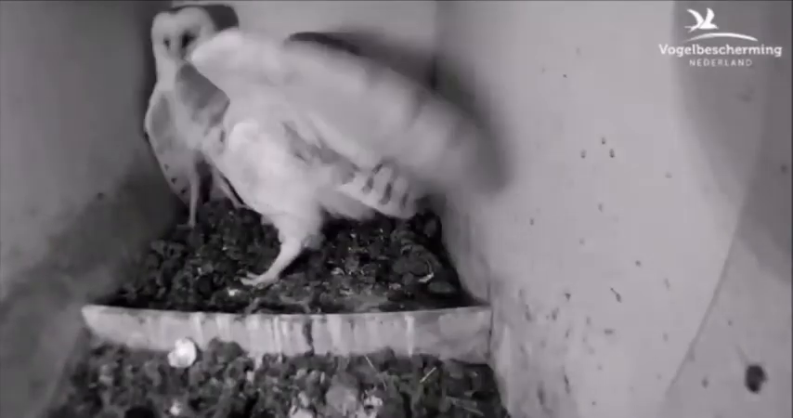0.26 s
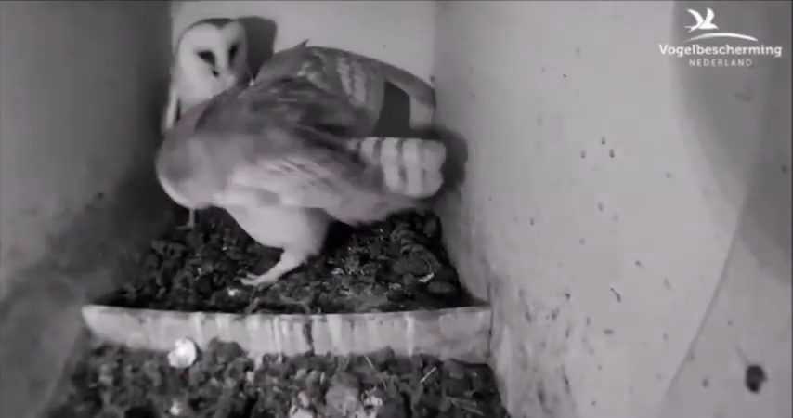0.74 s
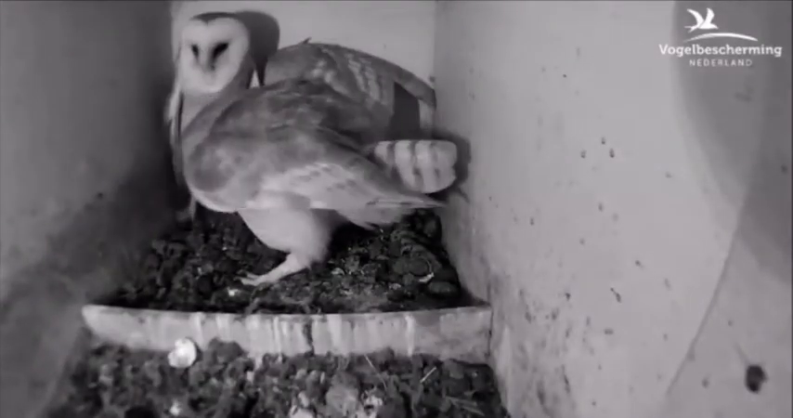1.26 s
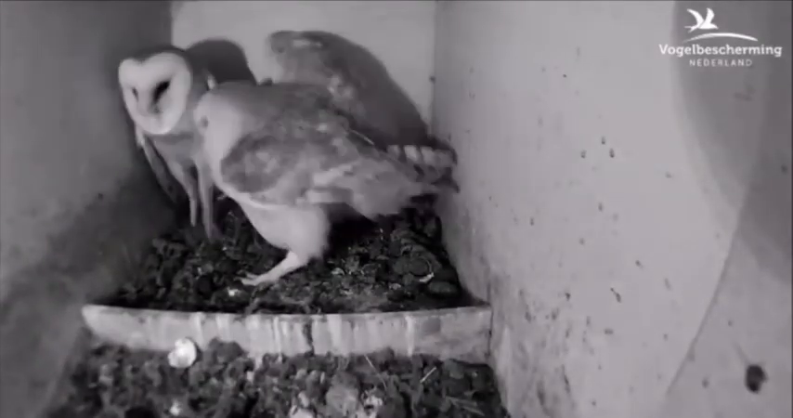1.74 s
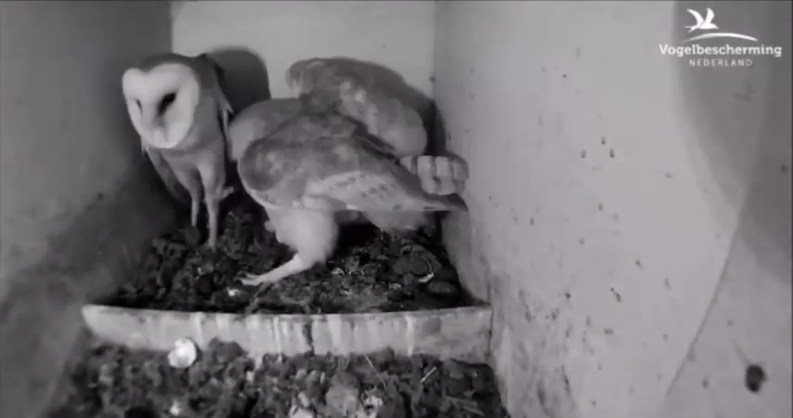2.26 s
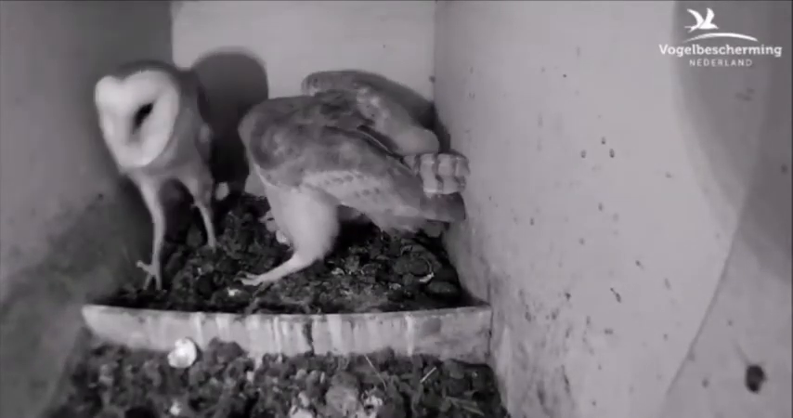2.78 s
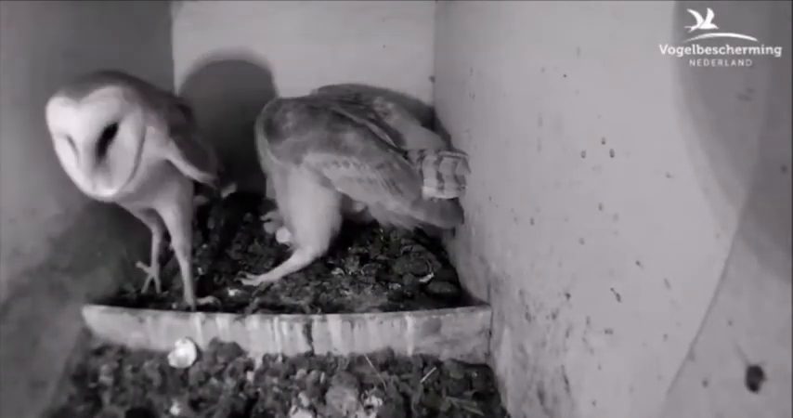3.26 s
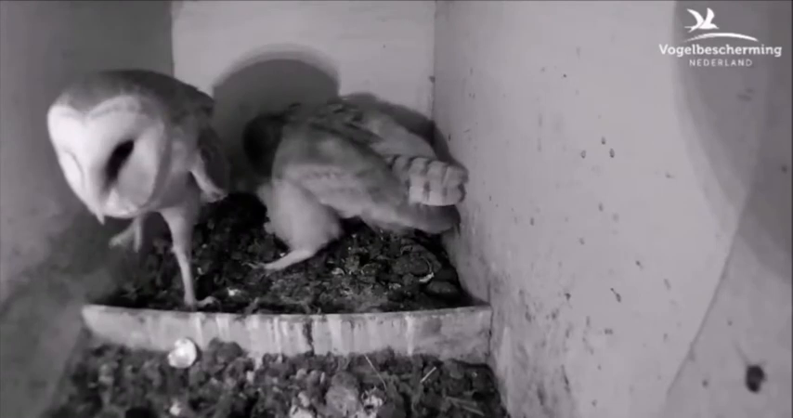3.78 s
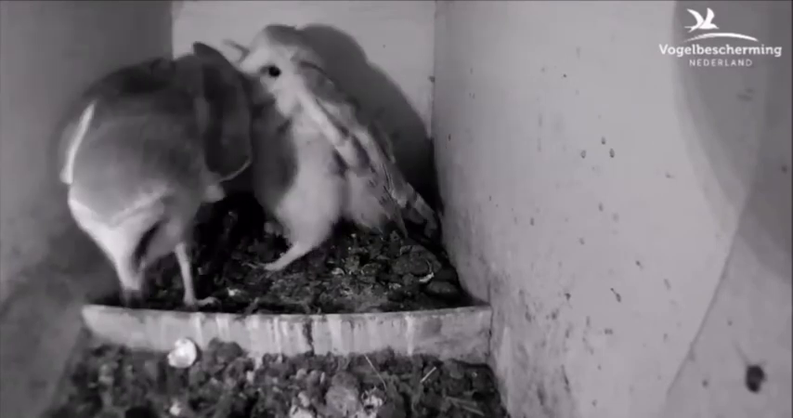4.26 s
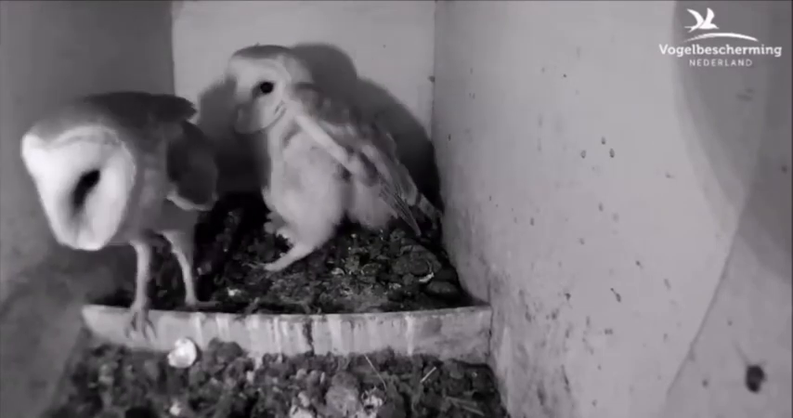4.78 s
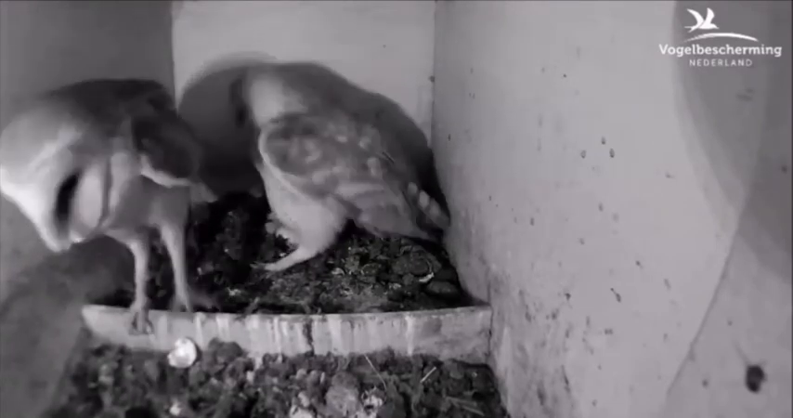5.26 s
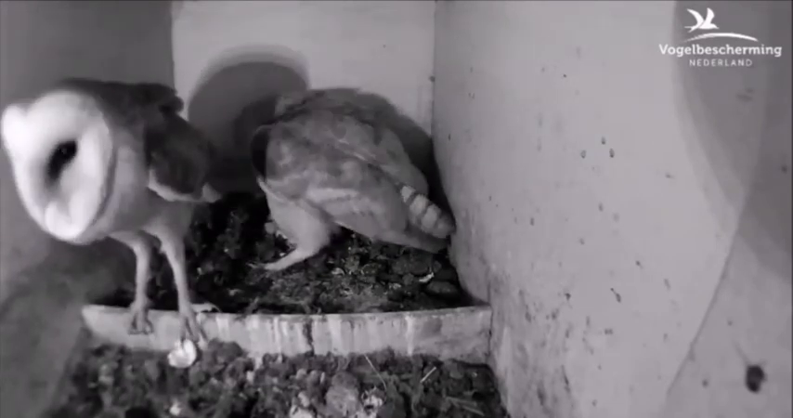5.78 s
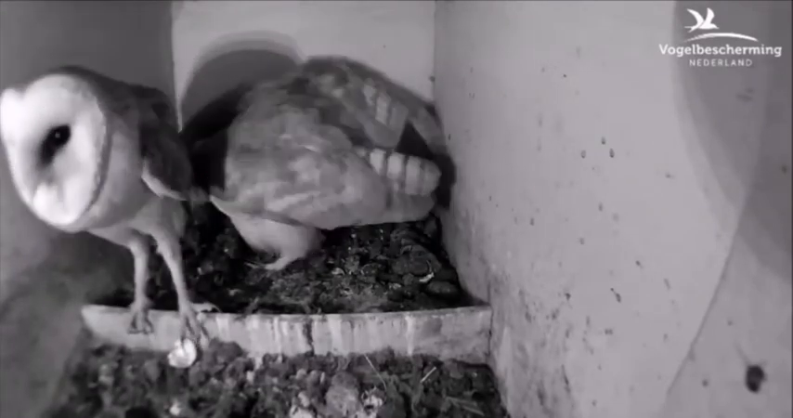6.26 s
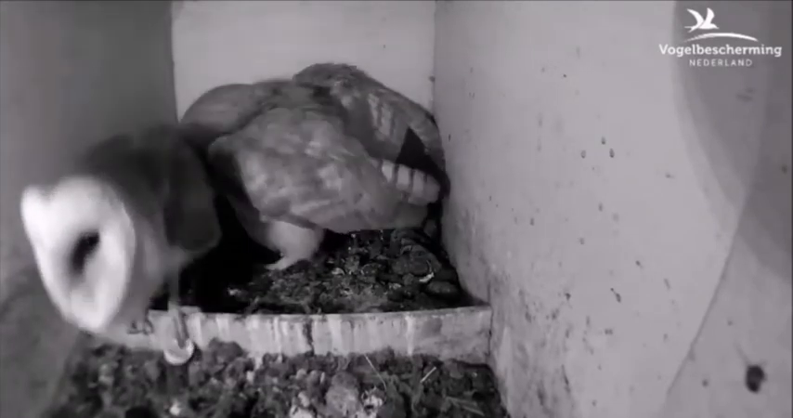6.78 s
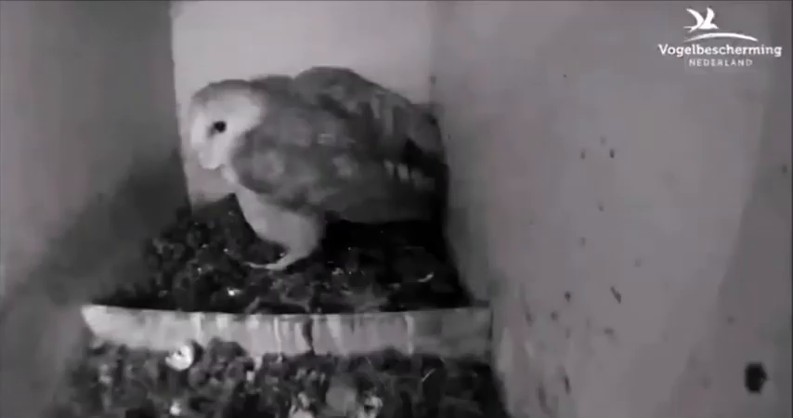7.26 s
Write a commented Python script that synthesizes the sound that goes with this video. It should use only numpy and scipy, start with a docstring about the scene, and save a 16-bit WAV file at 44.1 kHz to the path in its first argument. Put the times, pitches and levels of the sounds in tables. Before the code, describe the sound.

Inside a wooden nest box, a barn owl is already screeching: a long, rasping, fluttering hiss that swells and stops. A thinner, weaker hiss fills the break, then two more long screeches follow, with dull foot thuds on the boards. After the third, claws scratch the litter, two heavy bumps strike the box with a faint feather brush, and a new call just begins. Close, small, narrow-band microphone with little treble.

```python
"""Long rasping hiss-screeches, with thuds among them; the last begins after the bumps.
Two barn owls are in a wooden nest box: one gives three screeches and starts a fourth; a thinner hiss fills
the first break. In each, two shrill voices warble some fifty times a second through moving resonances.
Feet thud on the boards, which ring; one owl bumps the box twice as it leaves, its feathers brushing the wall.
Short gritty noise bursts are claws in the litter, a surge in the hiss and a last puff of the call.
A small, narrow-band microphone sits inside."""
import sys
import numpy as np
from scipy import signal
from scipy.fft import rfft, irfft, next_fast_len
from scipy.io import wavfile
from scipy.ndimage import uniform_filter1d

SR = 44100
rng = np.random.default_rng(int(sys.argv[2]) if len(sys.argv) > 2 else 0)


def file_out(sig):
    """Save sig as 16-bit WAV at sys.argv[1]."""
    # one column per channel
    cols = np.atleast_2d(sig).T
    # limit, then scale
    lim = np.clip(cols, -1, 1)
    pcm = np.round(lim * 32767).astype(np.int16)
    wavfile.write(sys.argv[1], SR, pcm)


N = 332073
TIME = np.arange(N) / SR
FRAME, HOP = 2048, 512  # samples in each short-time spectrum, and from one to the next

# Effort through each screech, as levels of its parts: time_s, throat_db, rasping_edge_db, high_hiss_db
FIRST_EFFORT = [(0.0, -37, -45, -63), (0.03, -42.5, -57, -90), (0.07, -39, -57, -59),
                (0.23, -34.5, -51.5, -60.5), (0.41, -37.5, -47.5, -57), (0.55, -35, -45, -49.5),
                (0.8, -29, -48, -49), (1.19, -25.5, -49.5, -41.5), (1.23, -27, -49.5, -40),
                (1.48, -27.5, -43, -42), (1.73, -28.5, -50.5, -48.5), (1.82, -30, -42.5, -42),
                (2.54, -27.5, -44, -41.5), (2.55, -27.5, -45.5, -41)]
THIN_EFFORT = [(2.6, -52, -49.5, -59), (2.688, -45.5, -48, -63), (2.7, -47.5, -53, -66),
               (2.94, -51, -65, -74.5), (2.99, -50.5, -69, -66), (3.018, -49.5, -74, -77),
               (3.1, -59.5, -95, -71.5)]
SECOND_EFFORT = [(3.11, -99, -92, -78), (3.194, -41.5, -62, -69.5), (3.332, -34.5, -47.5, -70.5),
                 (3.494, -28, -43, -53.5), (3.962, -27.5, -40.5, -43), (3.976, -30.5, -42.5, -46.5),
                 (4.216, -33.5, -45, -50.5), (4.742, -31, -43, -44.5), (4.79, -31.5, -46.5, -48.5)]
THIRD_EFFORT = [(5.2, -63, -74, -73), (5.266, -55.5, -84, -74), (5.32, -52, -84, -81),
                (5.36, -41, -63.5, -69), (5.572, -34, -53, -64.5), (5.661, -34, -49, -58),
                (5.793, -32.5, -48, -55), (6.452, -33, -44, -50.5), (6.549, -36, -43.5, -53.5)]
FOURTH_EFFORT = [(7.31, -96, -93, -95), (7.456, -54, -73, -85), (7.53, -55, -61, -72)]
# Moving resonances, one list per screech: time_s, lower_throat_hz, upper_throat_hz,
#   upper_db (over the lower), edge_hz, hiss_hz, cancelled_band_hz
MOVING_RESONANCES = [
    [(0.1, 1653, 2280, -6, 2950, 6270, 3720), (0.35, 1747, 2160, -3, 3123, 5240, 3710),
     (0.52, 1970, 2420, -2.5, 2890, 6810, 4240), (0.85, 1873, 2366, -1, 2670, 5320, 4230),
     (1.2, 2070, 2415, -1, 3620, 7410, 4460), (1.6, 1990, 2170, -18.5, 3430, 5976, 4030),
     (1.85, 2070, 2220, -7.5, 3430, 4970, 3970), (2.05, 2053, 2160, -9.5, 3510, 6810, 4090),
     (2.5, 2030, 2330, -8, 3418, 6160, 3830)],
    [(2.66, 1900, 2355, 0.5, 3550, 4760, 4250), (2.85, 2040, 2410, 9.5, 3073, 4970, 4200),
     (3.03, 1840, 2380, -5, 2845, 5661, 4270)],
    [(3.22, 1456, 2245, -1.5, 2909, 7450, 3710), (3.55, 1574, 2320, -3, 3332, 6150, 3840),
     (3.9, 1663, 2360, -2, 3380, 7270, 5300), (4.1, 1754, 2350, -1, 3060, 6280, 4863),
     (4.4, 1740, 2440, -5, 3111, 7100, 5140), (4.75, 1704, 2320, -1.5, 3510, 7300, 5180)],
    [(5.25, 1630, 2260, -15, 2870, 6500, 4100), (5.45, 1390, 2290, -1.5, 2834, 7260, 4330),
     (5.7, 1470, 2280, 2, 3060, 5860, 5400), (6.0, 1670, 2340, -1, 3270, 6230, 5670),
     (6.3, 1640, 2330, 0.5, 3294, 6730, 5500), (6.54, 1445, 2410, 4, 2960, 6580, 5060)],
    [(7.33, 1150, 2200, -22, 2900, 6400, 5000), (7.52, 1500, 2420, 7, 2900, 6400, 5000)],
]
# Fixed throat resonances of each screech: centre_hz, width_hz, level_db (over the lower moving one)
FIRST_THROAT = [(328, 440, -31), (1133, 178, -22), (1560, 264, -31), (3302, 222, -19), (5477, 997, -26),
                (6942, 573, -15)]
THIN_THROAT = [(299, 740, -14.5), (1074, 270, -16), (3240, 260, 5), (5440, 2194, -18)]
SECOND_THROAT = [(397, 870, -19.5), (1578, 82, 4.5), (1810, 82, 5), (3310, 290, -18), (4530, 190, -22),
                 (5100, 2800, -26), (6870, 460, -21)]
THIRD_THROAT = [(675, 1500, -20.5), (1480, 140, -1.5), (1880, 41, -4.5), (3204, 230, -13.5),
                (4660, 930, -19.5), (6130, 580, -20.5), (7270, 210, -13.5)]
FOURTH_THROAT = [(304.6, 2100, -11), (1150, 76, -2), (1370, 310, 8), (2420, 1000, -9), (6400, 1800, -16)]
# One row per screech: end_s, lower_throat_width_hz, upper_throat_width_hz, cancelled_depth (0 to 1),
#   flutter_db (scaled by growth and register), rush_start_db, rush_end_db (both before effort is followed),
#   break_off_db (sudden drop at the end; negative is a rise)
SCREECHES = [(2.564, 270, 340, 0.58, 1.5, -47, -51.5, 0), (3.1, 300, 295, .6, 4.8, -64.5, -61, -2),
             (4.823, 258, 285, 0.98, 1.65, -48.5, -57.5, 15),
             (6.558, 333, 244, 0.95, 2.1, -47.5, -54.5, 5.5), (7.53, 390, 905, 0.7, 3.3, -53.5, -54, 0)]
# The two voices of the syrinx, the bird's voice organ, one row per screech: lower_hz, lower_swing (share),
#   upper_hz, upper_swing (share), upper_db, breath_db (both before the colour is evened out)
VOICES = [(1634, .09, 2150, 0.1374, -4.5, -9), (1600, 0.07, 2600, 0.13, 1, -1.5),
          (1630, 0.138, 2420, 0.1615, -3, -10.5), (1580, 0.134, 2300, 0.201, -1, -5),
          (1410, 0.064, 2100, 0.18, -4, -10)]
# Partials of the lower voice, from its own pitch upwards: level_db
LOWER_PARTIALS_DB = [-5.5, -12, -10, -13]
# Standing waves of the air in the box: centre_hz, width_hz, level_db (over the direct sound)
STANDING_WAVES = [(231.6, 22, 21.5), (404, 34, 12), (485, 24, 10.5), (584, 88, 7), (964, 79, 10.5),
                  (1190, 21, 1), (1404, 39, 8), (1790, 150, 2), (2244, 52, 2), (2910, 120, 3.5),
                  (3340, 56, 0.5)]
# Registers of a screech (low rush, throat, edge, hiss): low_hz, high_hz
REGISTERS_HZ = [(110, 1250), (1250, 2700), (2700, 4000), (4000, 7700)]
# How deeply the puffs cut into each of those registers: factor
REGISTER_FLUTTER = [0.68, 0.73, 1.35, 1.35]
# Spectrum of the quiet in the box: frequency_hz, level_db (relative, per Hz)
QUIET_SPECTRUM = [(15, -56.5), (25, -14), (133, -12), (186, 0.5), (391, -20), (522, -19.5), (729, -23.5),
                  (4080, -34.5), (7600, -28.5), (9880, -63.5), (16700, -120)]
# Blows on the box: start_s, level_db (peak of the thud without the board's flex),
#   pitch_hz (favoured by the contact)
BLOWS = [(2.576, -44, 221), (3.08, -39.5, 211), (3.569, -34.5, 162), (3.687, -42, 260), (3.893, -47.5, 199),
         (4.709, -33, 258), (6.131, -30.5, 182), (6.642, -45.5, 326), (6.675, -44, 387), (6.752, -52, 183),
         (6.966, -27.5, 378), (6.98, -21, 374), (7.0, -33, 435), (7.049, -26, 500), (7.068, -29.5, 260)]
# Modes of the box, its own ringing tones: pitch_hz, level_db (relative), t60_s (time to fall 60 dB)
BOX_MODES = [(161, -7.5, 0.28), (188.5, 4.5, 0.18), (241.7, -6, 0.35), (272.4, 1.5, 0.14),
             (336.6, -14.5, 0.23), (410.5, -2, 0.081), (469, -7.5, 0.2), (492, 1.5, 0.11),
             (615, -24.5, 0.27), (763, -9.5, 0.16), (1000, -8.5, 0.06), (1358, 4.5, 0.031)]
# Short squeaks that catch in the hiss: start_s, peak_db, pitch_hz, length_s
SQUEAKS = [(2.666, -36, 3440, 0.013), (2.682, -38.5, 3433, 0.014), (5.182, -48, 1500, 0.034),
           (5.257, -42.5, 1490, .012), (6.31, -23, 2340, .014), (2.896, -36, 2440, 0.017),
           (6.05, -18, 2300, 0.0087), (6.172, -21.5, 2394, 0.01), (6.571, -32, 2320, 0.0085)]
# Feet shuffling in the litter: start_s, length_s (before the fade), level_db
SCUFFS = [(3.12, 1.8, -68), (5.174, 0.13, -47.5), (6.624, 0.22, -51.5), (7.187, 0.039, -47.5),
          (7.436, 0.17, -52.5)]
# Short gritty ticks (claws in the litter, a surge in the hiss, a last puff of the call):
#   start_s, peak_db, centre_hz
TICKS = [(3.126, -43, 1080), (5.041, -62, 610), (5.349, -28, 1480), (6.571, -34, 2190), (6.643, -51, 610),
         (6.674, -45, 676), (6.821, -47.5, 810), (6.962, -32.5, 690), (7.053, -32, 604), (7.06, -42, 1260)]
# Feathers brushing the wall: start_s, length_s (before the fade), level_db, attack_s
BRUSHES = [(6.955, 0.0079, -46.5, 0.012), (6.993, 0.4, -62, 0.053)]
# Spectrum of the feathers: frequency_hz, level_db (relative, per Hz)
FEATHER_SPECTRUM = [(300, 0), (1000, -6.5), (2500, -1.5), (3700, -6.5), (4700, -6), (5800, 3), (7300, -0.5),
                    (8000, -41)]

FLUTTER_PER_S, FLUTTER_SAG_PER_S = 55.5, 7.5  # puffs at the start of a call; how many fewer by its end
FLUTTER_GROWTH = 1.2  # the puffs deepen as the air runs out
SCOOP_SHARE, SCOOP_S = 0.13, 0.22  # each call starts flat and glides up to its pitch
UPPER_LAG_TURNS, UPPER_SKEW = 0.5, 0.3  # the upper voice climbs slowly between puffs and falls back fast
PITCH_JITTER, JITTER_HZ = 0.034, 261.4  # share of the pitch, and how quickly it wanders
EDGE_WIDTH_HZ, HISS_WIDTH_HZ = 250, 1000
NULL_WIDTH_HZ = 580  # the cancelled band sways as the owl moves its head
STEADINESS, SATURATION_KNEE = 0.75, 0.23
RING_SHARE = 0.22  # how strongly the saturated sound rings once more in the throat
RUSH_FOLLOWS = 0.2  # share of the effort that the low rush follows
REGISTER_LAG_S = 0.0015  # extra delay of the puffs in each higher register
ATTACK_S, RELEASE_DB_PER_S, TAIL_S = 0.001, 762.5, 0.29
QUIET_DB = -67.5
CONTACT_CYCLES = 1.1  # a duller contact lasts longer
FLEX_HZ, FLEX_DB, FLEX_T60_S = 63, -27, 0.17  # the whole floor board also gives under each blow
CUTOFF_HZ = 7600


def from_db(db):
    """Turns decibels into an amplitude factor."""
    return 10 ** (np.asarray(db) / 20)


def rms_one(x):
    """Scales a sound to an average strength (rms) of 1."""
    return x / np.sqrt(np.mean(x ** 2) + 1e-20)


def in_time(rows, times=TIME):
    """Reads each column of a curve at the given times."""
    s, *columns = np.transpose(rows)
    return [np.interp(times, s, column) for column in columns]


def add(out, s, sound):
    """Mixes a sound in at a time."""
    at = round(s * SR)
    out[at:at + len(sound)] += sound[:N - at]


def drift(rate, size):
    """Smooth chance wandering of spread 1, drawn at every 20th sample; rate in Hz."""
    length = next_fast_len(N // 20 + 2)
    hz = np.fft.rfftfreq(length, 20 / SR)
    spectrum = rfft(rng.standard_normal(length)) / (1 + (hz / rate) ** 4)
    slow = rms_one(irfft(spectrum, length))
    return np.interp(np.arange(size) / 20, np.arange(length), slow)


def resonance(hz, centre_hz, width_hz):
    """Power response of a steep-sided resonance."""
    return 1 / (1 + ((hz - centre_hz) / (0.75 * width_hz)) ** 2) ** 2


def resonances(hz, table):
    """Summed power response of several resonances."""
    return sum(from_db(db) ** 2 * resonance(hz, centre, width) for centre, width, db in table)


def coloured_noise(spectrum):
    """Noise with a given spectrum; rms 1."""
    hz, db = np.transpose(spectrum)
    noise_hz = np.fft.rfftfreq(N, 1 / SR)
    gain = from_db(np.interp(np.log(noise_hz + 1), np.log(hz), db))
    return rms_one(irfft(rfft(rng.standard_normal(N)) * gain, N))


def band_pass(x, centre_hz, q):
    """A broad emphasis around one pitch, using only past sound."""
    return signal.lfilter(*signal.iirpeak(centre_hz, q, fs=SR), x)


def stroke(s, length_s, attack_s, release_s):
    """Level that swells, holds, and dies away after its length."""
    swell = np.clip((TIME - s) / attack_s, 0, 1)
    return swell * np.exp(-np.maximum(TIME - s - length_s, 0) / release_s)


def frames_of(x):
    """Short-time spectra of a sound."""
    return signal.stft(x, SR, nperseg=FRAME, noverlap=FRAME - HOP)[2]


def filtered(frames, gain, size):
    """Sound of the frames under a gain per frequency and frame; rms 1."""
    sound = signal.istft(frames * gain, SR, nperseg=FRAME, noverlap=FRAME - HOP)[1]
    return rms_one(sound[:size])


def flutter(progress, jitter):
    """Phase of the quick puffs, which slow as the air runs out."""
    per_s = FLUTTER_PER_S - FLUTTER_SAG_PER_S * progress
    per_s = per_s * (1 + jitter * drift(14.22, size=len(progress)))
    return 2 * np.pi * np.cumsum(per_s) / SR


def syrinx(age, phase, voices, uneven):
    """Two shrill voices swing in pitch with every puff, never twice alike, over rushing breath."""
    low_hz, low_swing, high_hz, high_swing, high_db, breath_db = voices
    size = len(age)
    scoop = 1 - SCOOP_SHARE * np.exp(-age / SCOOP_S)
    late = phase - 2 * np.pi * UPPER_LAG_TURNS
    low_bend = low_swing * np.cos(phase)
    high_bend = high_swing * (np.sin(late) - UPPER_SKEW * np.sin(2 * late))
    angles = []
    for hz, swing in ((low_hz, low_bend), (high_hz, high_bend)):
        bend = swing * (1 + uneven * drift(35, size=size)) + PITCH_JITTER * drift(JITTER_HZ, size=size)
        angles.append(2 * np.pi * np.cumsum(hz * scoop * (1 + bend)) / SR)
    lower = sum(from_db(db) * np.sin((k + 1) * angles[0]) for k, db in enumerate(LOWER_PARTIALS_DB))
    upper = from_db(high_db) * np.sin(angles[1])
    breath = from_db(breath_db) * rng.standard_normal(size)
    return lower + upper + breath


def wall_echoes(x, echo_db, sway_s):
    """The near walls return the sound within milliseconds; the paths change as the owl moves its head."""
    at, out = np.arange(len(x)), x
    for k, path_s in enumerate(np.geomspace(0.0022, 0.019, 9)):
        lag = (path_s + sway_s * drift(0.92, size=len(x))) * SR
        out = out + (-1) ** k * from_db(echo_db) * np.interp(at - lag, at, x)
    return out


def evened_frames(x):
    """Short-time spectra with the lasting colour levelled out, so that throat and box alone set it."""
    frames = frames_of(x)
    power = uniform_filter1d(np.abs(frames) ** 2, size=25, axis=1)  # smoothed over time
    power = uniform_filter1d(power, size=7, axis=0)  # and over frequency
    return frames / np.sqrt(np.maximum(power, 1e-18))


def tract(hz, times, mouth, throat, low_width, high_width, null_depth):
    """Power response of the moving and fixed throat resonances, coloured by the air in the box."""
    low, high, db, edge, hiss, null = in_time(mouth, times)
    power = resonance(hz, low, low_width) + from_db(db) ** 2 * resonance(hz, high, high_width)
    power = power + resonances(hz, throat)
    beak = (1 + 2 * resonance(hz, edge, EDGE_WIDTH_HZ)) * (1 + 2 * resonance(hz, hiss, HISS_WIDTH_HZ))
    air = 1 + resonances(hz, STANDING_WAVES)
    cancelled = 1 - np.clip(null_depth, 0, 1) * resonance(hz, null, NULL_WIDTH_HZ)
    return power * beak * air * cancelled


def register_levels(effort, t, progress, start_db, end_db):
    """Levels in dB of low rush, throat, edge and hiss."""
    throat, edge, hiss = in_time(effort, t)
    rush = start_db + (end_db - start_db) * progress + RUSH_FOLLOWS * (throat - throat.max())
    return rush, throat, edge, hiss


def saturated(x, power):
    """The throat saturates: its swing stays nearly even, and it rings in its own resonances."""
    swing = np.abs(signal.hilbert(x, next_fast_len(len(x))))[:len(x)]
    even = x / (swing + SATURATION_KNEE) ** STEADINESS
    ring = power ** RING_SHARE
    gain = np.sqrt(ring * power.sum(0) / (ring * power).sum(0))
    return filtered(frames_of(even), gain, size=len(x))


def screech(effort, mouth, throat, call, voices, rough_db):
    """The warbling voices pass through the moving resonances of the throat and come out in puffs."""
    end, low_width, high_width, null_depth, flutter_db, *rush, drop_db = call
    start = max(0, effort[0][0])
    t = TIME[round(start * SR):round((end + TAIL_S) * SR)]
    progress = np.clip((t - start) / (end - start), 0, 1)
    phase = flutter(progress, jitter=0.02576)
    source = syrinx(t - start, phase, voices, uneven=0.301)
    frames = evened_frames(wall_echoes(source, echo_db=-12, sway_s=0.0002))
    hz = np.fft.rfftfreq(FRAME, 1 / SR)[:, None]
    frame_s = start + np.arange(frames.shape[1]) * HOP / SR
    power = tract(hz, frame_s, mouth, throat, low_width, high_width, null_depth)
    puffs_db = flutter_db * (1 + FLUTTER_GROWTH * (progress ** 2 - 0.5)) * np.cos(phase)
    grain_db = rough_db * drift(120, size=len(t))
    levels = register_levels(effort, t, progress, *rush)
    voice = 0
    for k, ((low, high), level_db) in enumerate(zip(REGISTERS_HZ, levels)):
        below_top = 1 / (1 + (hz / high) ** 40)
        above_bottom = 1 / (1 + (low / (hz + 1)) ** (40 if low > 1000 else 8))
        part = power * below_top * above_bottom
        sound = filtered(frames, np.sqrt(part / part.sum(0)), size=len(t))
        if k == 1:  # the throat register
            sound = saturated(sound, part)
        # each puff reaches the higher registers a little later
        late_puffs_db = np.interp(t - k * REGISTER_LAG_S, t, puffs_db)
        puffs = from_db(late_puffs_db * REGISTER_FLUTTER[k] + grain_db)
        voice = voice + rms_one(sound * puffs) * from_db(level_db)
    attack = np.clip((t - start) / ATTACK_S, 0, 1)
    release = from_db(-RELEASE_DB_PER_S * np.maximum(t - end, 0) - drop_db * (t > end))
    out = np.zeros(N)
    add(out, start, voice * attack * release)
    return out


def box_quiet():
    """Steady coloured noise is the quiet of the box."""
    return from_db(QUIET_DB) * coloured_noise(QUIET_SPECTRUM)


def box_ring():
    """The box's answer to one sharp push: its modes ring and die away."""
    t = TIME[:SR // 3]
    return sum((-1) ** k * from_db(db - 60 * t / t60) * np.sin(2 * np.pi * hz * t)
               for k, (hz, db, t60) in enumerate(BOX_MODES))


def blows(contact_q, padding_q, crunch):
    """Feet and wings push on the boards through the litter; the box rings."""
    out, box = np.zeros(N), box_ring()
    t = TIME[:len(box)]
    flex = from_db(FLEX_DB - 60 * t / FLEX_T60_S) * np.sin(2 * np.pi * FLEX_HZ * t)
    for s, db, hz in BLOWS:
        force = crunch * rng.standard_normal(len(t)) * np.exp(-t * hz / CONTACT_CYCLES)
        force[0] += 1  # the first sharp push
        padded = band_pass(band_pass(force, hz, contact_q), hz, padding_q)
        thud = signal.fftconvolve(padded, box)[:len(t)]
        add(out, s, from_db(db) * (thud / np.abs(thud).max() + flex))
    return out


def squeaks(waver):
    """For an instant the throat locks onto one pitch, a sine that swells and fades."""
    out = np.zeros(N)
    for s, db, hz, length_s in SQUEAKS:
        size = round(length_s * SR)
        phase = 2 * np.pi * np.cumsum(hz * (1 + waver * drift(200, size=size))) / SR
        add(out, s, from_db(db) * np.hanning(size) * np.sin(phase))
    return out


def shuffle(soft_hz, uneven_db):
    """Soft uneven scuffs push on the box as noise and keep the boards murmuring."""
    force = rng.standard_normal(N) * from_db(uneven_db * drift(25, size=N))
    force = band_pass(band_pass(force, soft_hz, 0.81), soft_hz, 0.81)
    murmur = rms_one(signal.fftconvolve(force, box_ring())[:N])
    weight = sum(from_db(db) * stroke(s, length_s, attack_s=0.08, release_s=0.032)
                 for s, length_s, db in SCUFFS)
    return weight * murmur


def ticks(t60, tail_db, tail_t60, q, dull_hz):
    """Each tick is a short gritty burst of noise around one pitch, with a weaker, longer tail."""
    out, t = np.zeros(N), TIME[:SR // 6]
    fade = from_db(-60 * t / t60) + from_db(tail_db - 60 * t / tail_t60)
    for s, db, hz in TICKS:
        grit = rng.standard_normal(len(t)) * fade
        tick = signal.lfilter(*signal.butter(4, dull_hz, fs=SR), band_pass(grit, hz, q))
        add(out, s, from_db(db) * tick / np.abs(tick).max())
    return out


def feathers(release_share):
    """Feathers hiss along the wall as coloured noise; a slow stroke also fades slowly."""
    weight = sum(from_db(db) * stroke(s, length_s, attack_s, release_share * attack_s + 0.015)
                 for s, length_s, db, attack_s in BRUSHES)
    return weight * coloured_noise(FEATHER_SPECTRUM)


def scene():
    """The screeches, the owls' movements and the quiet of the box."""
    efforts = [FIRST_EFFORT, THIN_EFFORT, SECOND_EFFORT, THIRD_EFFORT, FOURTH_EFFORT]
    throats = [FIRST_THROAT, THIN_THROAT, SECOND_THROAT, THIRD_THROAT, FOURTH_THROAT]
    calls = zip(efforts, MOVING_RESONANCES, throats, SCREECHES, VOICES)
    owls = sum(screech(*tables, rough_db=1.73) for tables in calls) + squeaks(waver=0.0097)
    feet = blows(contact_q=3.2, padding_q=0.92, crunch=0.068) + shuffle(soft_hz=250, uneven_db=3.5)
    grit = ticks(t60=0.046, tail_db=-22.0, tail_t60=0.14, q=4.4, dull_hz=2910)
    return (owls + box_quiet() + feet + grit + feathers(release_share=0.24))[None]


def record(dry):
    """The microphone has a deep notch in the mid treble and passes almost nothing above its cutoff."""
    notch = signal.butter(2, [3830, 4200], "bandstop", fs=SR, output="sos")
    low_pass = signal.ellip(8, 0.5, 70, CUTOFF_HZ, fs=SR, output="sos")
    return signal.sosfilt(low_pass, signal.sosfilt(notch, dry))


dry = scene()
out = record(dry)
file_out(out)
```